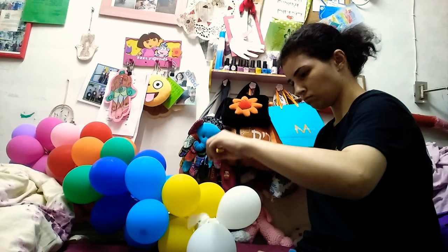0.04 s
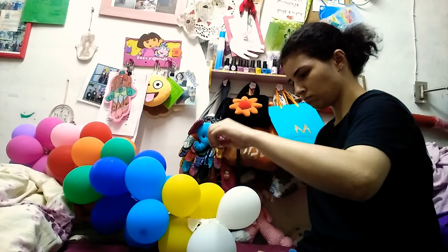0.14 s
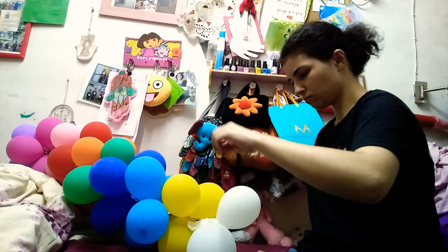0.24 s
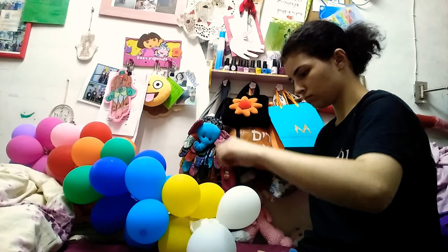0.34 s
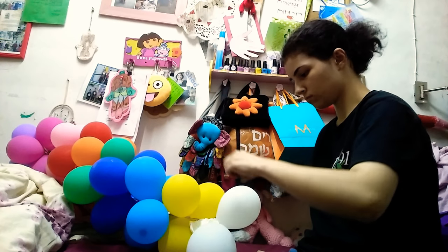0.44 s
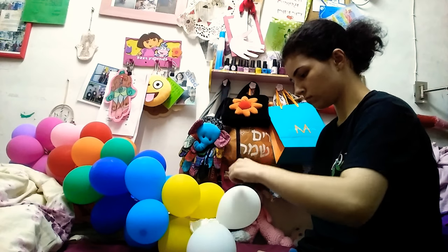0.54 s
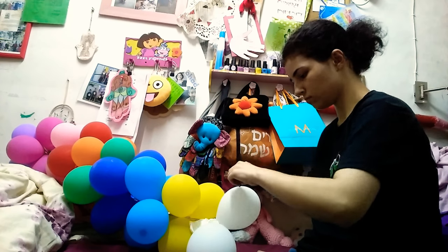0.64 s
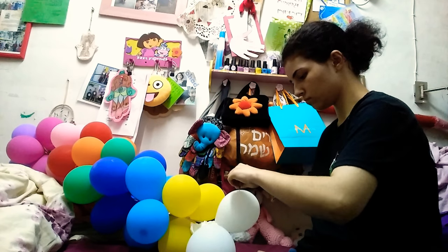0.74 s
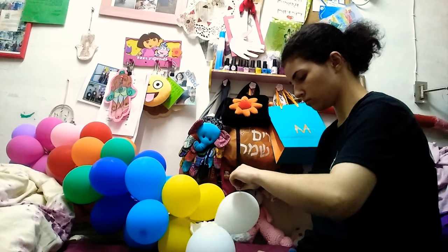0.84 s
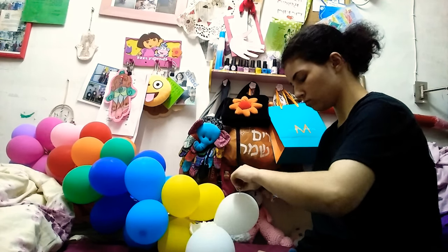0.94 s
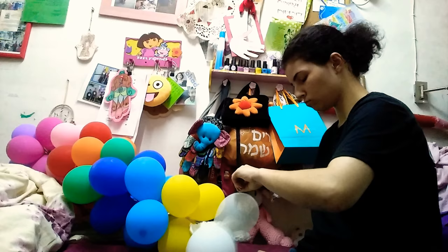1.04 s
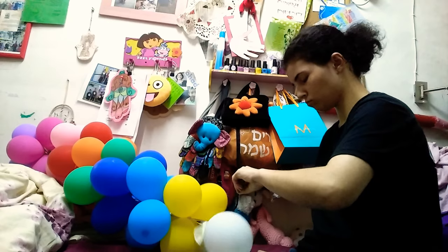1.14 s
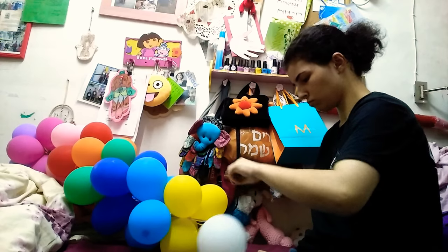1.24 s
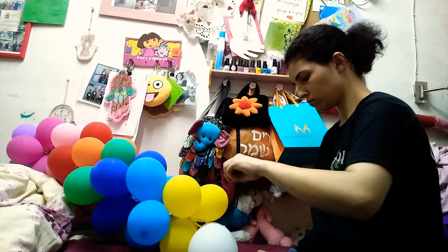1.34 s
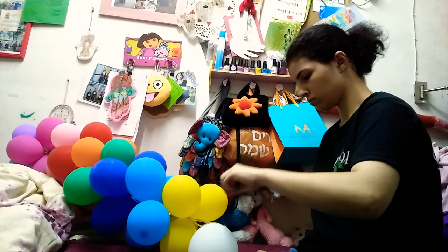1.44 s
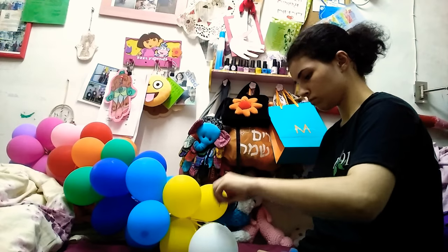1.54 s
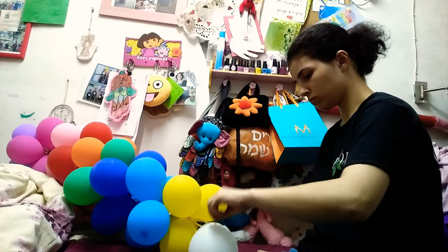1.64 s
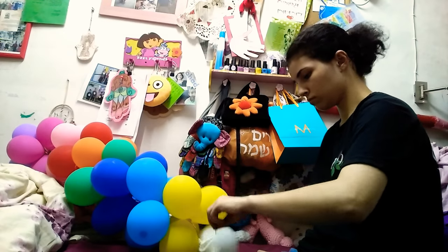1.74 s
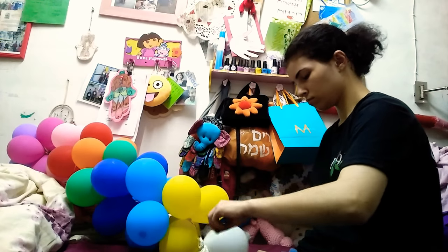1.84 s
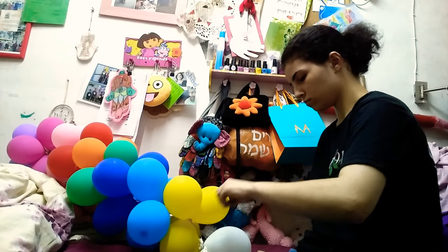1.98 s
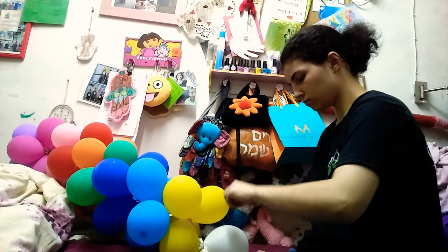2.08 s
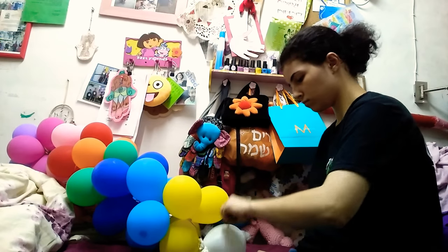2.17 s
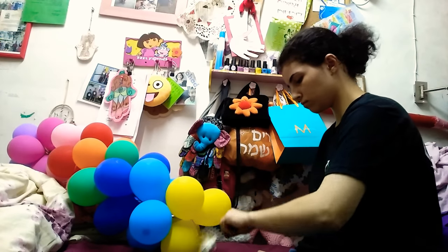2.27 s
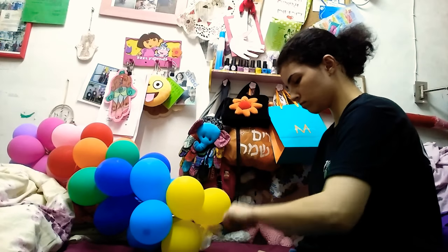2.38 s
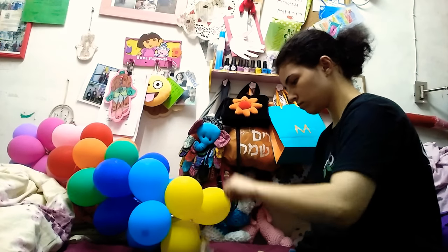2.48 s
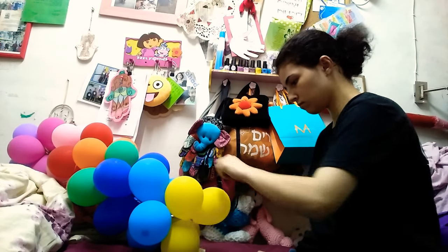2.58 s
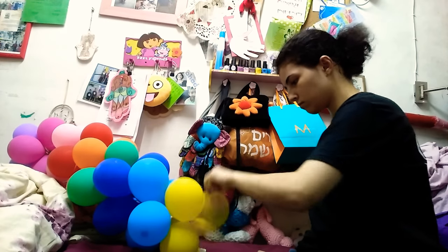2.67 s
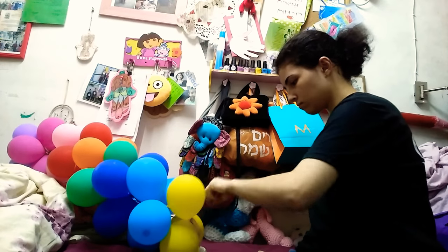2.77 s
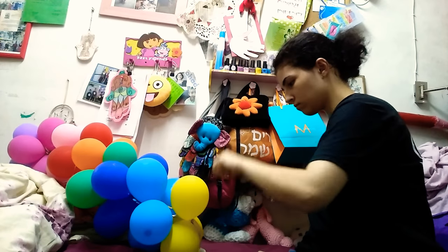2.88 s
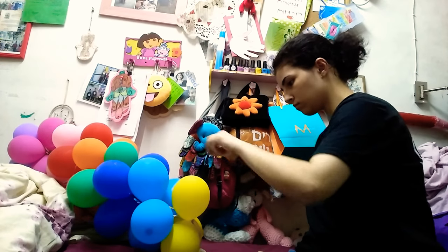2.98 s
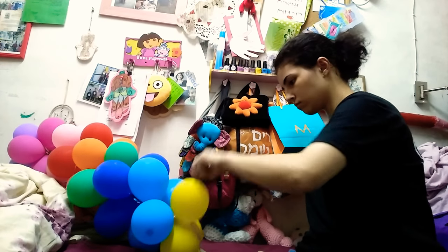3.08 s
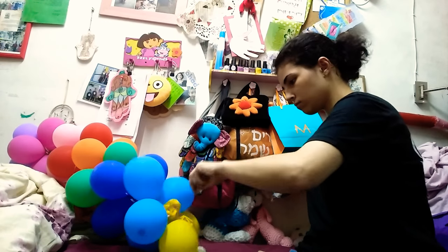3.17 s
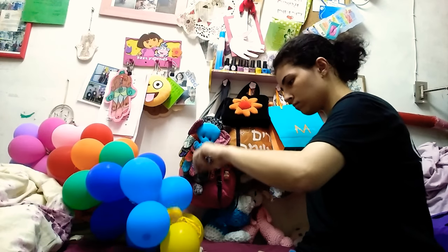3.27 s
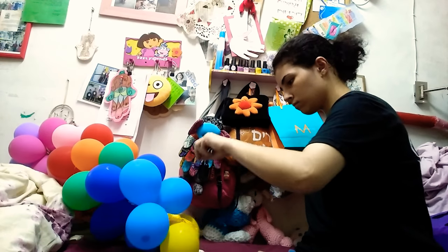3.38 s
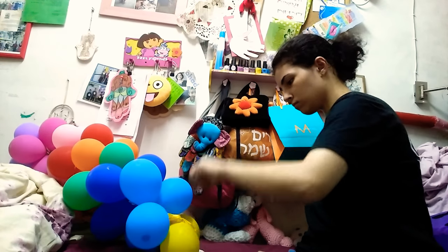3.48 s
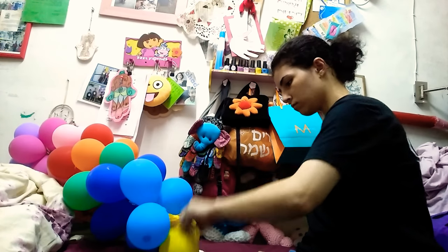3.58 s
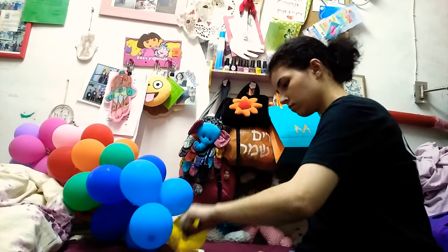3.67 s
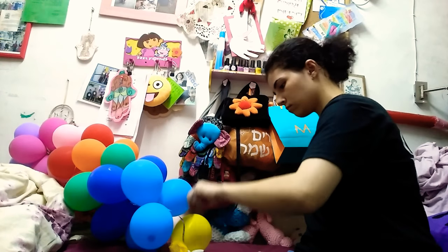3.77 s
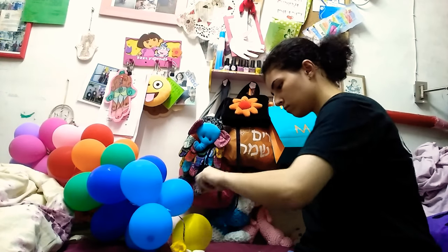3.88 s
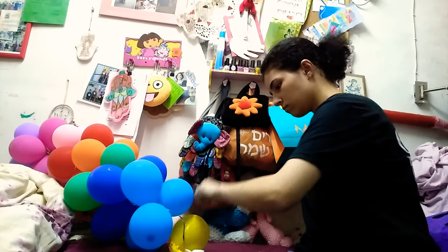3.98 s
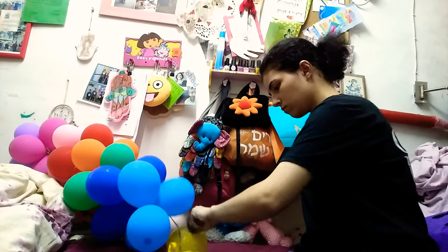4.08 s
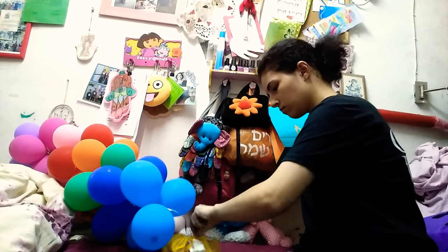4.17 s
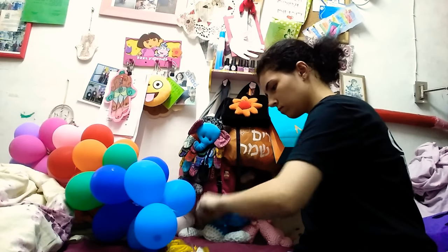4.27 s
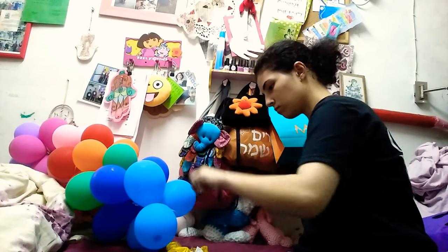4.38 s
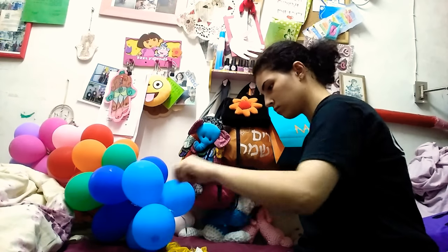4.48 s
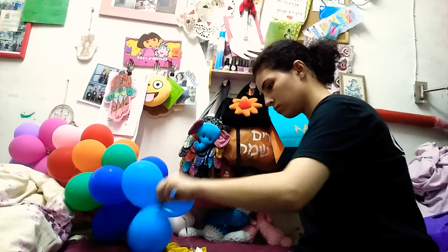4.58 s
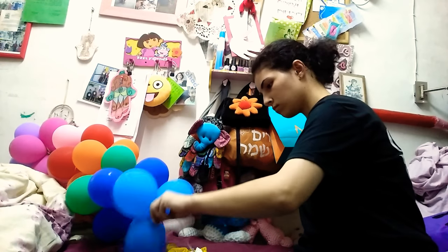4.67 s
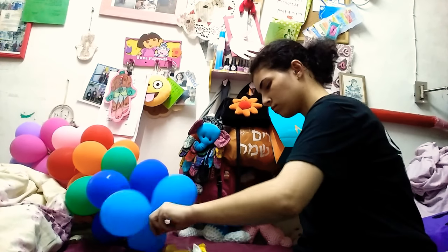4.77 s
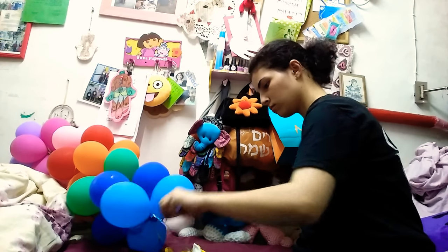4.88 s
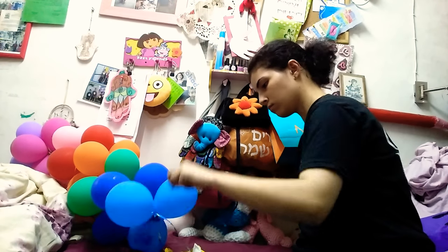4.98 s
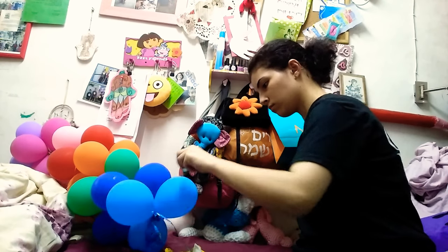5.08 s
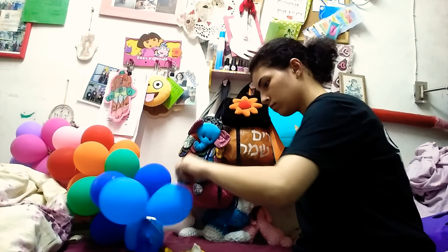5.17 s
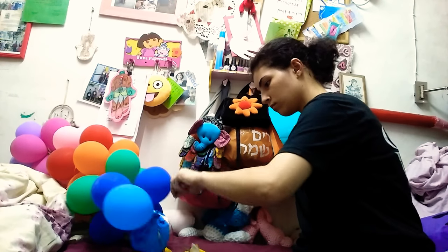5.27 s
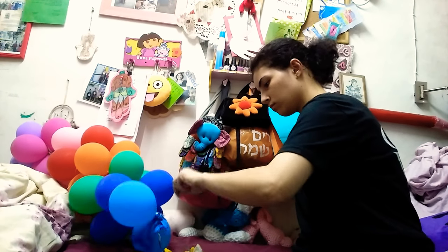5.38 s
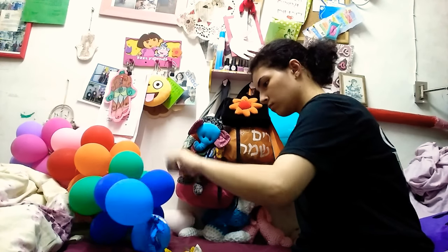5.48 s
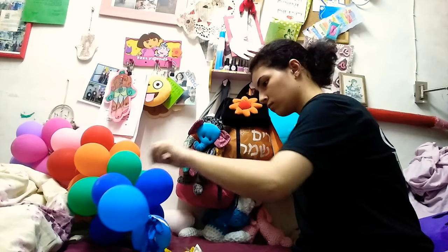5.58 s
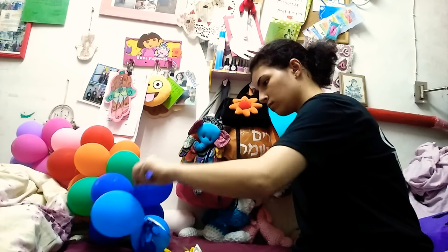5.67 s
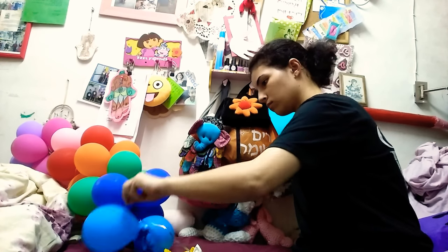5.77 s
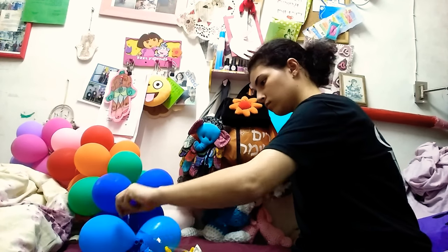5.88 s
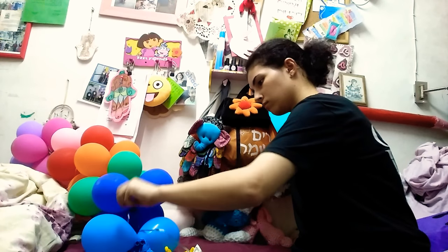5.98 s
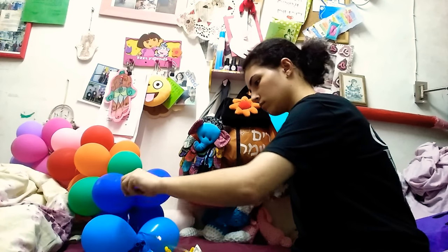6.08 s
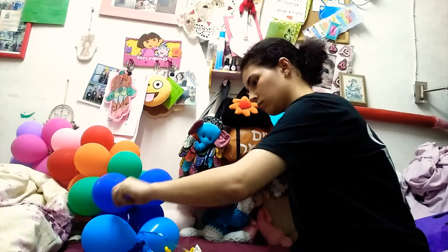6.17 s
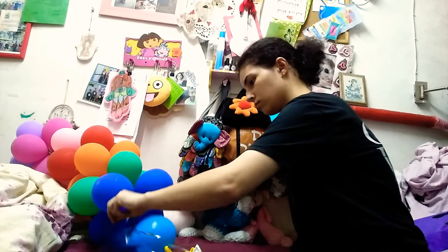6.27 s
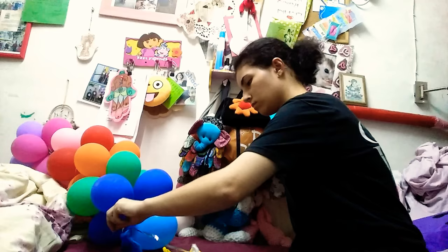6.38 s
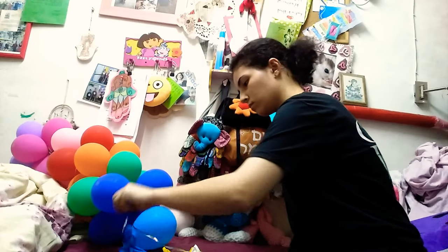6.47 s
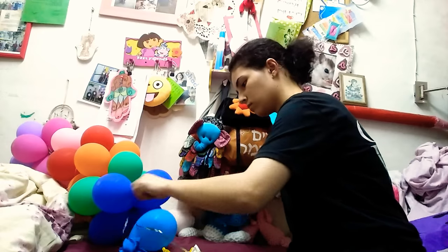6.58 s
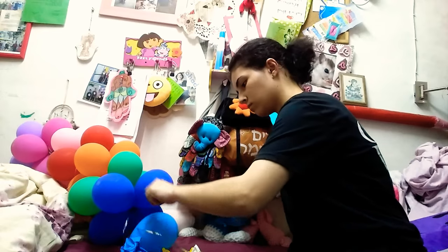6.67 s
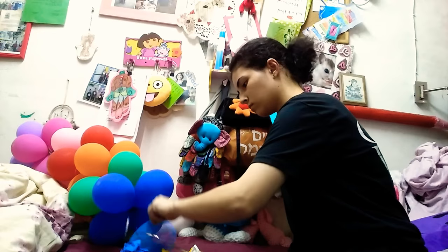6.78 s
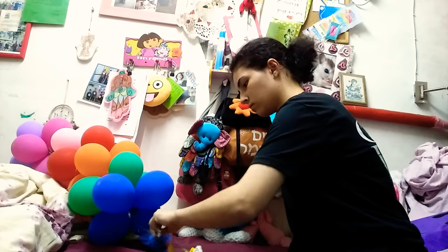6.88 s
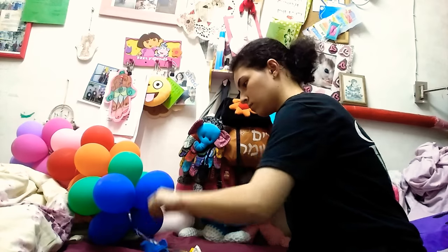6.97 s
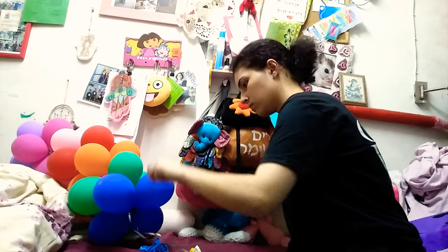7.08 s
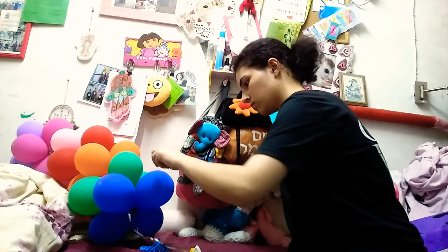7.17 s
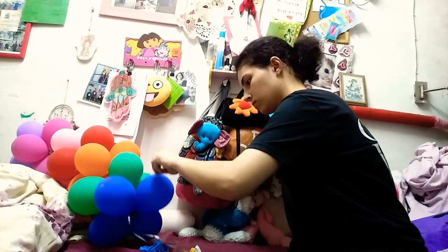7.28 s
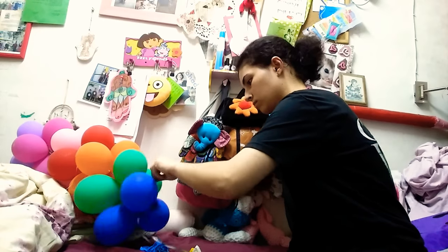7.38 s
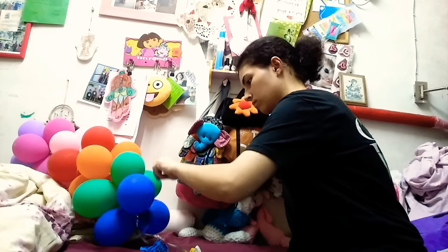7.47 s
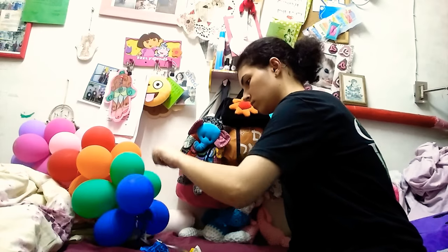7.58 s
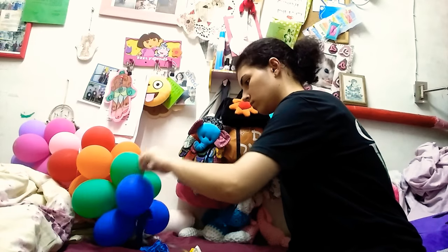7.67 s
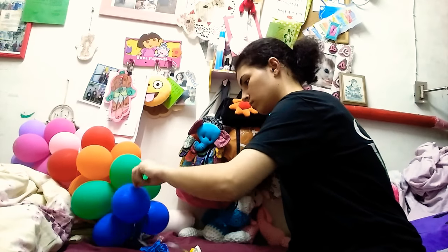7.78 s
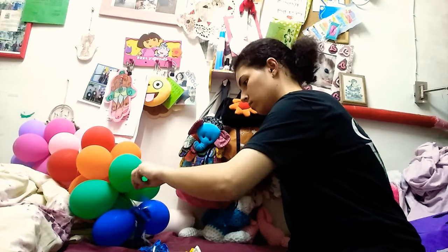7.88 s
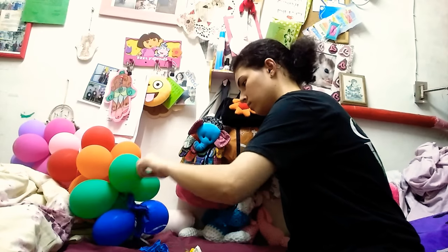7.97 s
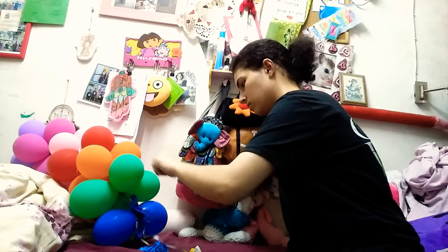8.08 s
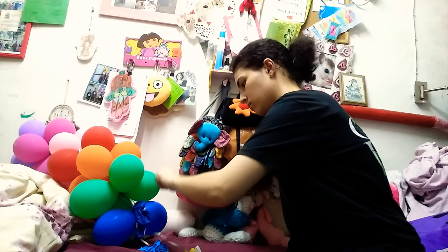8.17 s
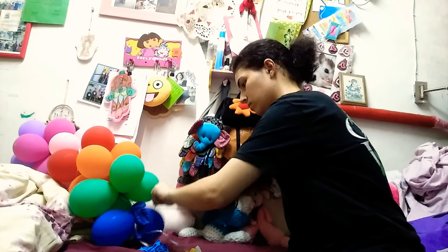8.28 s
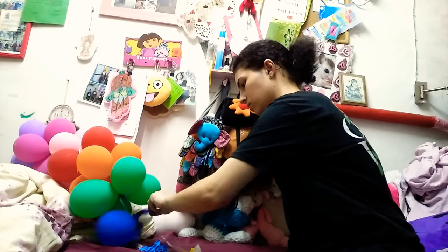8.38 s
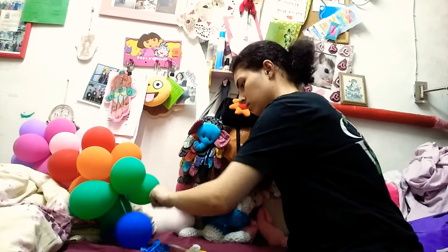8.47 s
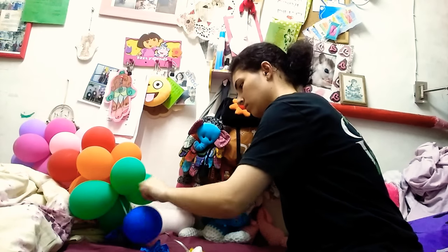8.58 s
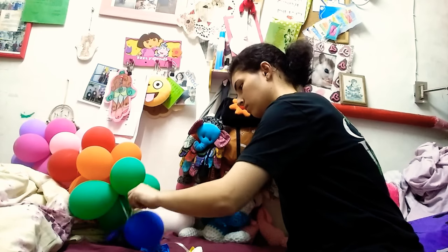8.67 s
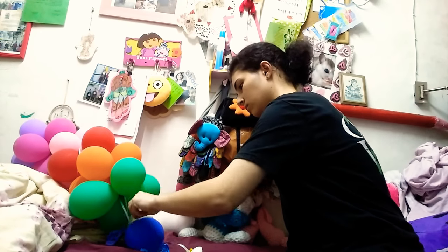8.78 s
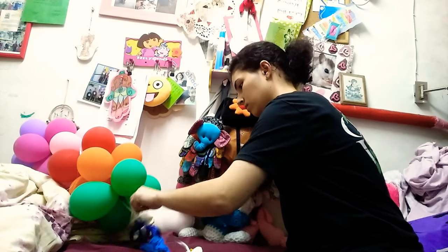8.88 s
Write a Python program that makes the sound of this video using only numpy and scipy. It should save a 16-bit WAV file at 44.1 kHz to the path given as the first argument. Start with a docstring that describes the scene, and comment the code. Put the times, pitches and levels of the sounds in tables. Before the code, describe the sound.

Fifteen sharp balloon bursts at roughly half-second intervals, short dry room echo, with quiet rubbing, hissing and tiny squeaks in the gaps.

```python
"""In a small furnished bedroom, a bunch of party balloons is popped with a pin, one after another. Sharp noise
snaps are the rubber splitting, and around each the air bursts out: damped swings, room resonances and a dense
noise wash, with flying rubber on top, loud enough to clip the microphones. Between the pops, enveloped noise
makes the balloons rustle and narrow resonances squeak; after each pop the background swells, dull and airy, and
fades again. Below it all lie the quiet room air and a thin electrical whine of steady sines."""
import sys
import numpy as np
from scipy import signal
from scipy.fft import irfft, next_fast_len
from scipy.io import wavfile

SR = 44100
rng = np.random.default_rng(int(sys.argv[2]) if len(sys.argv) > 2 else 0)


def materialize(psi):
    """Save the field psi as 16-bit PCM at rate SR to the path in sys.argv[1].

    A 1-D psi becomes a single channel; in a 2-D psi each row is a channel.
    """
    bounded = np.clip(np.atleast_2d(psi).T, -1, 1)
    quanta = np.round(bounded * 32767).astype(np.int16)
    wavfile.write(sys.argv[1], SR, quanta)


N = 394254  # samples in the scene

# air bursts: start_s, blast_db, blast_tilt_db_per_octave, first_swing_db (relative to the blast), rubber_db,
# rubber_tilt_db_per_octave, swell_db (peak level of the background swell after the pop)
BURSTS = [(1.06, -7, -1, 0, 4.5, 3, -63), (1.7168, -5.5, -3, -3, 9, 2, -64.5),
          (2.246, -7.5, -2.5, 1.5, 1.5, 1.5, -58), (2.6891, -8, -0.5, -4.5, 1.5, 1.5, -54),
          (3.1505, -11.5, -1.5, -5, 0, 0.5, -51.5), (3.6372, -12, -1.5, 6, 7, -7.5, -64),
          (4.1037, -7.5, -3, 3, 6, -8, -67), (4.6881, -8.5, -1, -2, 1.5, -0.5, -51.5),
          (5.2258, -8.5, -1.5, -2.5, 0, -1, -54.5), (6.2736, -8, -1, -1, 3, 1.5, -61.5),
          (6.793, -7.5, -0.5, -2.5, -0.5, 2, -58), (7.31, -10, -1.5, -1.5, -1, 2, -50),
          (7.8095, -10.5, -1, -3.5, -1, 0.5, -62.5), (8.361, -9.5, -1, -4, -2, 0.5, -60.5),
          (8.8326, -11, 0, -4, -2.5, 1, -62)]
# colour of rubbing rubber: frequency_hz, density_db_per_hz (relative)
RUBBING_COLOUR = [(60, -22.5), (300, -2), (600, -4.5), (850, -5), (1050, 3.5), (1400, -7.5), (3000, -8),
                  (6000, -17), (11000, -23), (16000, -29)]

POP_TIME = np.arange(int(.3 * SR)) / SR  # seconds
ROOM_T60_S, TREBLE_T60_S = 0.12, 0.14
PORT_LAG_S = .00007  # scale of the random timing offsets between the microphone ports


def from_db(db):
    """Decibels to gain."""
    return 10 ** (np.asarray(db) / 20)


def at_hz(points, hz):
    """Read a table on a log-frequency axis."""
    points = np.array(points)
    return np.interp(np.log(hz), np.log(points[:, 0]), points[:, 1])


def tilted(spectrum, tilt, low_hz, high_hz):
    """A spectrum leaning by tilt dB per octave between two frequencies, about their middle."""
    middle_hz = np.sqrt(low_hz * high_hz)
    return [(hz, db + tilt * np.log2(np.clip(hz, low_hz, high_hz) / middle_hz)) for hz, db in spectrum]


def add(out, s, sound):
    """Mix a sound in at time s."""
    start = max(round(s * SR), 0)
    out[:, start:start + sound.shape[-1]] += sound[..., :N - start]


def dying(t60, t=POP_TIME):
    """An envelope that falls by 60 dB in t60 seconds."""
    return np.exp(-np.log(1000) * t / t60)


def wash(t60, build_s):
    """Envelope of dense reflections: they build up, then die."""
    return (1 - np.exp(-POP_TIME / build_s)) * dying(t60)


def stroke(length_s):
    """Envelope of one rubbing movement: a quick swell and a slower release."""
    progress = np.linspace(0, 1, int(length_s * SR))
    return np.sin(np.pi * np.sqrt(progress)) ** 2


def grainy(envelope, grain_db, per_s):
    """An envelope broken into uneven grains by a random level curve with per_s points a second."""
    place = np.arange(len(envelope)) * per_s / SR
    steps = rng.standard_normal(int(place[-1]) + 2)
    level_db = grain_db * np.interp(place, np.arange(len(steps)), steps)
    return envelope * from_db(level_db)


def ring(hz, t60, phase=0):
    """One damped sine swing."""
    return np.sin(2 * np.pi * hz * POP_TIME + phase) * dying(t60)


def noise(spectrum, size, tilt=0):
    """Coloured stereo noise at rms 1; mixing mid and side sets how alike left and right are per band."""
    # left-right likeness of the sound in the room: frequency_hz, correlation
    likeness = [(100, 1), (350, 0.095), (700, 0.045), (1400, 0.59), (3000, .15), (6000, 0), (16000, 0)]
    padded = next_fast_len(size)
    hz = np.maximum(np.fft.rfftfreq(padded, 1 / SR), 1)
    alike = np.clip(at_hz(likeness, hz), -1, 1)
    mid, side = np.exp(2j * np.pi * rng.random((2, len(hz))))
    both = np.sqrt(1 + alike) * mid + np.sqrt(1 - alike) * side * [[1], [-1]]
    colour = from_db(at_hz(spectrum, hz) + tilt * np.log2(hz))
    x = irfft(both * colour, padded)[:, :size]
    return x / np.sqrt(np.mean(x ** 2))


def burst(spectrum, envelope, tilt=0):
    """Noise under an envelope, carrying exactly the envelope's energy."""
    x = noise(spectrum, len(envelope), tilt) * envelope
    return x * np.sqrt(np.mean(envelope ** 2) / np.mean(x ** 2))


def background(hush_db=-61.5):
    """Quiet room air as steady noise, with a thin electrical whine whose close tones beat."""
    # electrical whine: frequency_hz, level_db (rms)
    whine_tones = [(3510, -84.5), (3666, -85), (3779, -80.5), (3828, -78), (10724, -92.5)]
    # colour of the room air: frequency_hz, density_db_per_hz (relative)
    hush_colour = [(30, -18.5), (60, -17), (100, -2.5), (160, -9), (310, -1.5), (520, -8.5), (800, -11),
                   (1000, -10.5), (1400, -20.5), (3600, -18), (5500, -24.5), (8000, -33.5), (10500, -34),
                   (16000, -39.5)]
    t = np.arange(N) / SR
    whine = 0
    for hz, db in whine_tones:
        whine = whine + np.sqrt(2) * from_db(db) * np.sin(2 * np.pi * (hz * t + rng.random()))
    return from_db(hush_db) * noise(hush_colour, N) + whine


def swells(rise_s=.03, dull_t60_s=1.2, hiss_db=-71, hiss_t60_s=1.3):
    """After each pop the background swells: a dull part and an airy hiss rise quickly and die away slowly."""
    # colour of the airy hiss in the swell: frequency_hz, density_db_per_hz (relative)
    hiss_colour = [(1500, -20), (4500, -1), (10000, 1), (16000, -9.5)]
    t = np.arange(N) / SR
    dull_power, hiss_power = np.zeros(N), np.zeros(N)
    for s, *_, swell_db in BURSTS:
        since = np.maximum(t - s, 0)
        swell = 1 - np.exp(-since / rise_s)  # zero until the pop
        dull_power += (from_db(swell_db) * swell * dying(dull_t60_s, since)) ** 2
        hiss_power += (from_db(hiss_db) * swell * dying(hiss_t60_s, since)) ** 2
    dull = np.sqrt(dull_power) * noise(RUBBING_COLOUR, N)
    airy = np.sqrt(hiss_power) * noise(hiss_colour, N)
    return dull + airy


def rustles():
    """Rubber sticks and slips as the hand brushes the bunch, and a bright hiss rises near 6.4 s and 6.9 s:
    grainy noise strokes."""
    # hand and balloons rubbing, except the rows at 6.35 s and 6.859 s, which are a bright hiss of air: start_s,
    # length_s, level_db, tilt_db_per_octave
    rubs = [(.0, 0.15, -54.5, -0.5), (.64, 0.4, -61, -2), (1.305, 0.11, -54.5, -1), (1.65, 0.14, -58.5, -1),
            (2.13, 0.24, -62.5, -4), (2.423, 0.26, -66, 1), (2.788, 0.14, -57, -2.5),
            (2.951, 0.18, -64, -1.5), (3.822, 0.041, -54, 0), (4.576, 0.15, -50, -0.5),
            (4.669, 0.033, -43, -3), (5.151, 0.19, -55, 0), (5.72, 0.12, -60, -2),
            (6.002, 0.036, -59.5, 3.5), (6.18, 0.21, -64.5, -1), (6.35, 0.55, -62, 6.5),
            (6.859, .3, -66, 8), (7.066, 0.09, -46, 4), (7.116, 0.13, -52.5, 0.5), (7.234, .14, -56, 0.5),
            (7.68, 0.16, -61, -1.5), (7.726, 0.091, -54.5, 6.5), (8.265, 0.13, -54.5, -2.5),
            (8.691, 0.19, -60, -0.5)]
    out = np.zeros((2, N))
    for s, length_s, db, tilt in rubs:
        slipping = grainy(stroke(length_s), grain_db=3, per_s=300)
        add(out, s, from_db(db) * burst(RUBBING_COLOUR, slipping, tilt))
    return out


def squeaks(width_hz=170):
    """Uneven slips of dragged rubber drive one narrow resonance of a taut balloon."""
    # faint squeaks: start_s, length_s, pitch_hz, level_db
    drags = [(.63, .04, 2010, -65), (0.682, 0.1, 2050, -61), (0.768, 0.25, 2040, -73),
             (.79, 0.28, 1070, -66), (1.861, 0.1, 1060, -61), (3.321, 0.28, 1044, -65),
             (3.827, .05, 990, -57.5), (4.582, .1, 960, -55), (4.645, 0.017, 960, -39),
             (5.358, .14, 1005, -64), (5.819, 0.19, 1000, -66), (8.263, 0.059, 1020, -58)]
    out = np.zeros((2, N))
    for s, length_s, hz, db in drags:
        swell = stroke(length_s)
        slips = rng.standard_normal(len(swell))
        b, a = signal.iirpeak(hz, hz / width_hz, fs=SR)
        tone = signal.lfilter(b, a, signal.lfilter(b, a, slips))  # twice, for steeper skirts
        add(out, s, from_db(db) * swell * tone / np.std(tone))
    return out


def snaps(wash_db=-5.0, lead_s=.003):
    """The taut skin splits: noise rises for three milliseconds and dies fast; echoes and room follow."""
    # skin splitting at the pin: start_s, level_db, left_over_right_db
    splits = [(1.0517, -19, 2), (1.715, -11, -1), (2.2252, -14.5, -2), (2.6643, -14.5, 2.5),
              (3.079, -12, 5), (3.5735, -12.5, 3.5), (3.6369, -12, -2.5), (4.0135, -14.5, 7),
              (4.1043, -12.5, -0.5), (4.6851, -10.5, 2.5), (5.2252, -8, -5.5), (6.2531, -13, 4.5),
              (6.7617, -13.5, 2.5), (7.299, -16, -1), (7.7869, -10, 5), (8.3493, -15, 0),
              (8.8219, -17.5, 0.5)]
    # first echoes, off bed and wall: delay_s (varied by up to a tenth), level_db (relative to the snap)
    echoes = [(.0042, -12.5), (.0085, -14.5)]
    # colour of a snap: frequency_hz, density_db_per_hz (relative)
    snap_colour = [(40, -21), (120, -11.5), (220, -9.5), (350, -3), (600, -9), (850, 1), (1120, 1.5),
                   (1500, -8), (2200, -8), (3600, -7.5), (7000, -11), (11000, -10.5), (16000, -17)]
    out = np.zeros((2, N))
    t = POP_TIME - lead_s
    decay_s = np.where(t < 0, .004, .007)  # t60 before and after the peak
    tearing = from_db(5) * dying(decay_s, np.abs(t))
    for s, db, pan_db in splits:
        crack = from_db(db) * burst(snap_colour, tearing, tilt=0.68)
        add(out, s - lead_s, crack * from_db([[pan_db / 2], [-pan_db / 2]]))
        for delay_s, echo_db in echoes:
            add(out, s - lead_s + delay_s * rng.uniform(.9, 1.1), crack * from_db(echo_db))
        room = burst(snap_colour, wash(TREBLE_T60_S, build_s=0.004))
        add(out, s, from_db(db + wash_db) * room)
    return out


def air_ball(size_spread=0.068):
    """The freed ball of air swings in and out, faster for smaller balloons, offset between the ports."""
    # swings: pitch_hz (for a middling balloon), level_db (relative), t60_s
    swings = [(794, 25.5, .010), (318, 16, 0.027), (1116, 21.5, .009)]
    size, side = rng.standard_normal(2)
    pitch = np.exp(size_spread * size)
    lag_s = PORT_LAG_S * side * np.array([[.5], [-.5]])
    swing = 0
    for k, (hz, db, t60) in enumerate(swings):
        sign = (-1) ** k
        swing = swing + sign * from_db(db) * ring(hz * pitch, t60, 2 * np.pi * hz * lag_s)
    return swing * (1 - dying(0.0012))  # soft onset


def standing_waves(modes, phases, spread_db=1.5, phase_spread=0.37):
    """The room's modes ring at both ports; each balloon sits a little elsewhere in them."""
    out = 0
    for (hz, db), phase in zip(modes, phases):
        strength, shift = rng.standard_normal(2)
        gain = from_db(db + spread_db * strength)
        out = out + gain * ring(hz, ROOM_T60_S, phase[:, None] + phase_spread * shift)
    return out * (1 - dying(.035))  # they need a few crossings of the room to build up


def bangs(wash_db=4.0, modes_db=0.0, shreds_db=-17.5, slap_db=-10.0, slap_t60=.008):
    """The air ball swings, the room answers with modes and wash, the skin slaps back and flies in shreds."""
    # bedroom resonances: frequency_hz, level_db (relative, before tilt and spread)
    room_modes = [(106, -9), (145, -17.5), (199, -14.5), (302, -11), (369, -2), (420, -11), (440, -10),
                  (479, -9.5), (565, -13.5), (621, -5.5), (670, -2), (768, -5.5), (870, -8), (928, -6.5),
                  (997, -9.5), (1067, -11), (1117, -9)]
    # colour of the blast in the room: frequency_hz, density_db_per_hz (relative)
    blast_colour = [(30, -22.5), (65, -18), (105, -8), (160, -11), (230, -3), (350, 0), (500, -4), (750, 0),
                    (1050, 1), (1400, -14), (2000, -17.5), (4000, -29.5), (8000, -40.5), (16000, -42.5)]
    # colour of the torn rubber: frequency_hz, density_db_per_hz (relative)
    shred_colour = [(100, -10.5), (1000, -5.5), (1400, 0.5), (2200, 1), (4000, 1), (7000, -7.5),
                    (11000, -7), (16000, -8)]
    out = np.zeros((2, N))
    phases = []
    for hz, _ in room_modes:  # each mode reaches the two ports from its own direction
        start_turn = rng.random()
        lag_turns = hz * PORT_LAG_S * rng.standard_normal() * np.array([1, -1])
        phases.append(2 * np.pi * (start_turn + lag_turns))
    for s, blast_db, tilt, swing_db, rubber_db, rubber_tilt, _ in BURSTS:
        direct = from_db(swing_db) * air_ball()
        modes = from_db(modes_db) * standing_waves(tilted(room_modes, tilt, 360, 1200), phases)
        room_envelope = wash(ROOM_T60_S, build_s=0.00085)
        room = from_db(wash_db) * burst(tilted(blast_colour, tilt, 250, 1500), room_envelope)
        flying = from_db(shreds_db) * grainy(wash(TREBLE_T60_S, build_s=.0018), grain_db=1.0, per_s=360)
        slap = from_db(slap_db) * dying(slap_t60)
        rubber = burst(tilted(shred_colour, rubber_tilt, 1400, 16000), flying + slap)
        add(out, s, from_db(blast_db) * (direct + modes + room) + from_db(rubber_db) * rubber)
    return out


def scene():
    """The quiet room, its swells after the pops, the handled bunch and the pops."""
    between_pops = swells() + rustles() + squeaks()
    return background() + between_pops + snaps() + bangs()


def port(x, resonances):
    """Peaks and dips of the narrow duct in front of a microphone, as a chain of bell filters."""
    for hz, width_hz, db in resonances:
        w, gain = 2 * np.pi * hz / SR, from_db(db / 2)
        damp = np.tan(np.pi * width_hz / SR)
        b = [1 + damp * gain, -2 * np.cos(w), 1 - damp * gain]
        a = [1 + damp / gain, -2 * np.cos(w), 1 - damp / gain]
        x = signal.lfilter(b, a, x)
    return x


def record(dry, low_cut_hz=75, cutoff_hz=16000):
    """The microphones shed deep bass, ports colour the treble, loud peaks clip flat, and the top is cut."""
    # colour of each microphone port: frequency_hz, width_hz, level_db
    left_port = [(4500, 3400, 1.5), (7900, 660, -4)]
    right_port = [(5400, 5100, -3.5), (10280, 3300, 10), (13640, 2200, -16.5)]
    lean = signal.sosfilt(signal.butter(2, low_cut_hz, "high", fs=SR, output="sos"), dry)
    heard = np.array([port(lean[0], left_port), port(lean[1], right_port)])
    clipped = np.clip(heard, -.97, .97)
    return signal.sosfilt(signal.ellip(10, .1, 70, cutoff_hz, fs=SR, output="sos"), clipped)


dry = scene()
out = record(dry)
materialize(out)
```